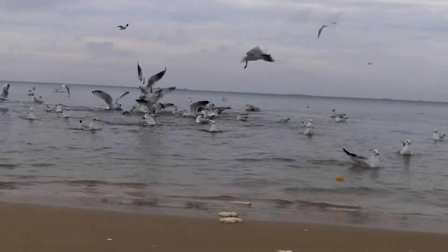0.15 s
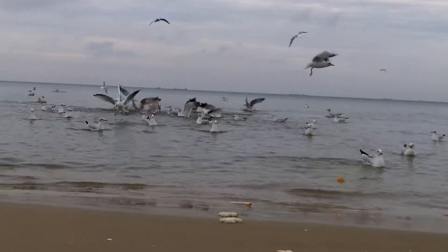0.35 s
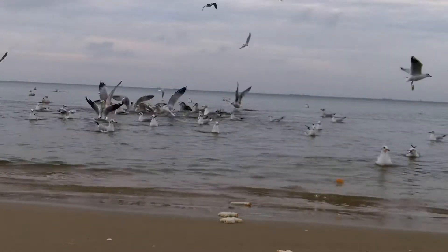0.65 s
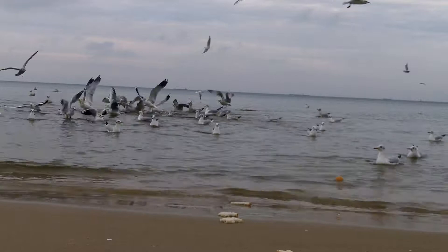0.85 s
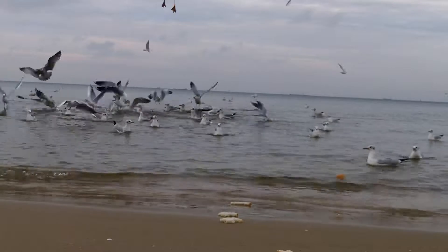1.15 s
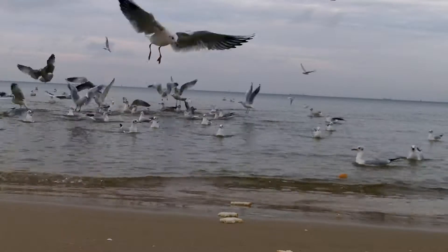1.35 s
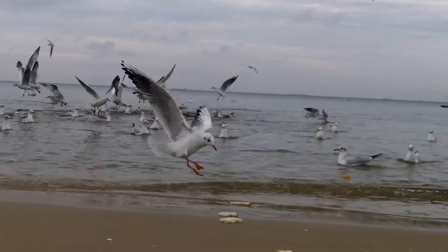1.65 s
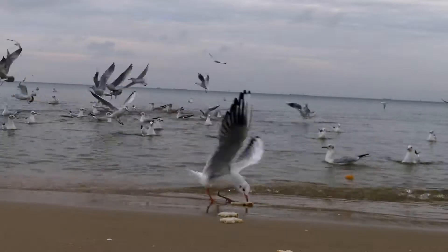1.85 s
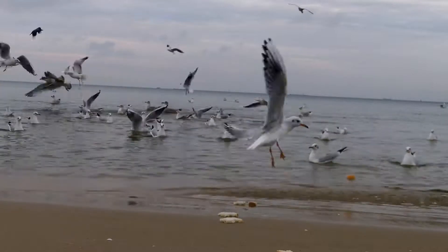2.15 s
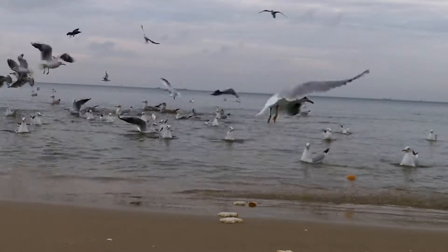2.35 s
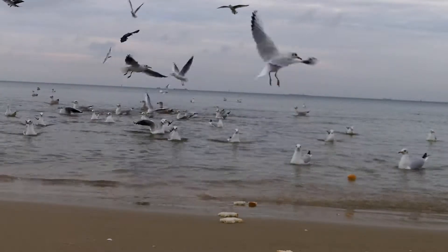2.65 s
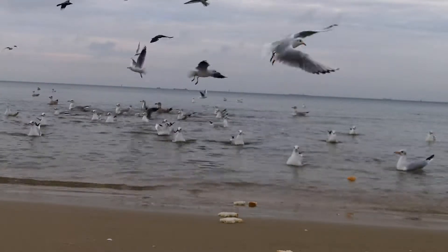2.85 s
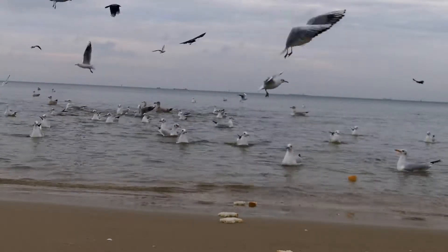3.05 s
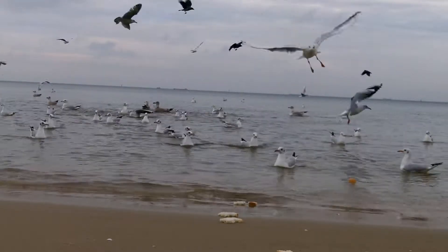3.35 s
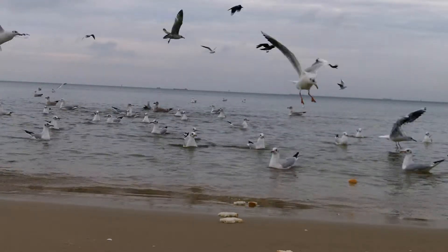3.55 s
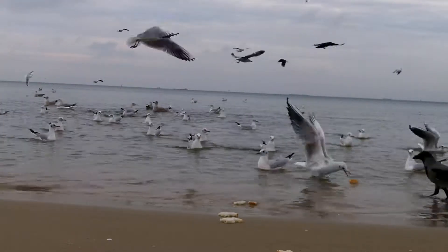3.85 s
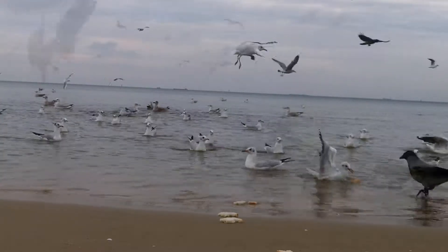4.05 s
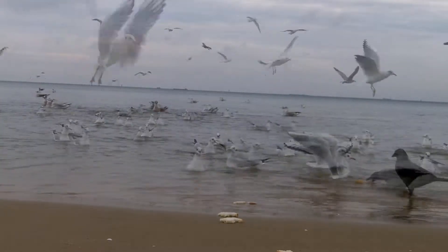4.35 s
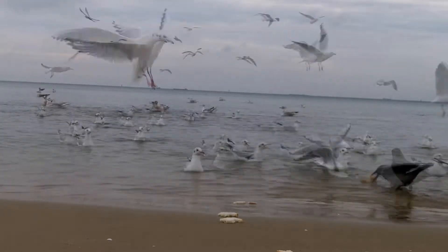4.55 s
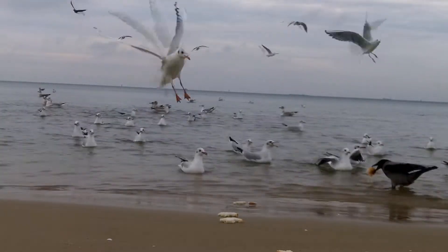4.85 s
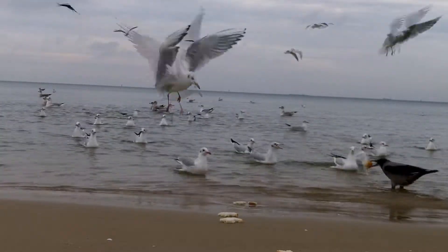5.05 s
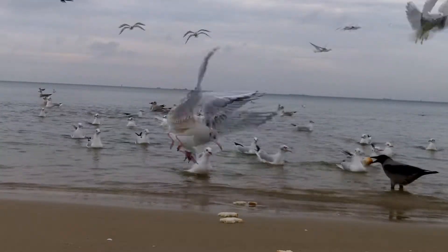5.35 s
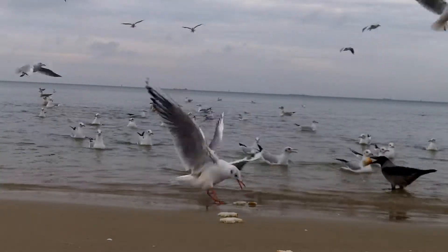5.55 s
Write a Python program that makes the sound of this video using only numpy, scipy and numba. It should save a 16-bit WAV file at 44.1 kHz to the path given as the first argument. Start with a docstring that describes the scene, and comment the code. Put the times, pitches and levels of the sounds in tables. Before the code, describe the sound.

Close gulls squabble at a calm water's edge. Clear wavering mews open over distant barking, then harsh screams, dry creaks and thin squeals overlap. Quick barks dominate the middle, with another scream past three seconds. The crowd thins, two screams follow each other, and a rasping wail sinks to a clear tone. Soft plops and low sea rumble lie beneath. Open air, nearly dry, microphone near the birds.

```python
"""Small gulls squabble over scraps in the shallows of a calm beach: membrane pulses ring throat and bill.
Long rasping screams, mews, creaks, short barks and a late wail overlap close by; gliding tones make thin squeals.
A flock of barks calls farther out, and bills snap as very short rings of noise.
Bodies plop into the water with ringing cavities and spray, and small bubbles sound over a low rumble of sea air,
built from bands of noise whose level slowly rises and falls."""
import sys
import numpy as np
from scipy import signal
from scipy.io import wavfile
from scipy.ndimage import uniform_filter1d
from numba import njit

SR = 44100
rng = np.random.default_rng(int(sys.argv[2]) if len(sys.argv) > 2 else 0)


def dump(signal):
    """Clip the signal to [-1, 1] and save it as 16-bit WAV at the path in sys.argv[1]."""
    limited = np.clip(np.atleast_2d(signal).T, -1, 1)
    pcm = np.round(limited * 32767).astype(np.int16)
    wavfile.write(sys.argv[1], SR, pcm)


N = 250929
TIME = np.arange(N) / SR

MEW_ROUGHNESS = .14  # 0-1
COLLAPSE, COLLAPSE_S = 0.22, 0.018  # share of the pitch lost at the end of a scream or wail, time constant


def undb(db):
    """Amplitude of a level in dB."""
    return 10 ** (np.asarray(db) / 20)


def unit(x):
    """The same sound at an overall RMS of 1."""
    return x / np.sqrt(np.mean(x ** 2) + 1e-18)


def steady(x):
    """The same sound at an even level of 1."""
    power = np.abs(uniform_filter1d(x ** 2, size=1400))
    return x / np.sqrt(power + 1e-12)


def walk(n, rate):
    """Smooth chance of spread about 1 that takes a new value rate times a second."""
    size = max(int(SR / rate), 1)
    held = np.repeat(rng.standard_normal(n // size + 2), size)
    return 1.2 * uniform_filter1d(held, size)[:n]


def cut(x, hz, kind, order=2):
    """Plain low or high cut."""
    return signal.sosfilt(signal.butter(order, min(hz, .45 * SR), kind, fs=SR, output="sos"), x)


@njit
def svf(x, hz, width):
    """State-variable band-pass whose centre may move."""
    y, band, low = np.empty(len(x)), 0., 0.
    for i in range(len(x)):
        g, k = np.tan(np.pi * hz[i] / SR), width / hz[i]
        v = (band + g * (x[i] - low)) / (1 + g * (g + k))
        band, low, y[i] = 2 * v - band, low + 2 * g * v, k * v
    return y


def ring(x, hz, width_hz):
    """A resonance at a fixed or moving pitch."""
    return svf(x + 1e-18, hz * np.ones(len(x)), float(width_hz))


def fade(n, seconds):
    """Soft start and end."""
    i = np.arange(n)
    return np.sin(np.pi / 2 * np.clip(np.minimum(i, n - i) / (seconds * SR), 0, 1)) ** 2


def add(out, start, x):
    """Lay a sound into the mix from a start in seconds."""
    i = max(int(start * SR), 0)
    out[i:i + len(x)] += x[:max(N - i, 0)]


def follow(rows):
    """Start time, then each control sample by sample."""
    s, *controls = np.transpose(rows)
    t = np.arange(s[0], s[-1], 1 / SR)
    return s[0], *(np.interp(t, s, control) for control in controls)


def syrinx(hz, flutter, rough, split, flutter_hz=133, blur=0):
    """Membrane pulses; a slower vibration chops them into a trill, and strain blurs them and makes them uneven."""
    swing, jitter, air_level = .05, .11, .7  # pitch shares moved by trill and roughness, then air amplitude
    trill_break = .4  # above this flutter the voice stops between bursts and starts afresh
    trill_skew = 1.3  # each burst swells slowly and shuts quickly
    n, flutter, rough = len(hz), np.clip(flutter, 0, 1), np.clip(rough, 0, 1)
    bursts = np.cumsum(flutter_hz * (1 + (.008 + .2 * rough ** 2) * walk(n, 150))) / SR
    opening = -np.cos(2 * np.pi * (bursts % 1) ** trill_skew)

    bend = 1 + swing * flutter * opening
    bend = bend + jitter * rough * cut(walk(n, 900), 90, "high", order=1)
    bend = bend + (.002 + .002 * rough) * walk(n, 60)
    phase = 2 * np.pi * np.cumsum(hz * bend) / SR
    # in a deep trill every burst starts from rest, which packs the partials at the rate of the trill
    restart = (np.diff(np.floor(bursts), prepend=0) > 0) & (flutter > trill_break)
    last_restart = np.maximum.accumulate(np.arange(n) * restart)
    phase = phase - phase[last_restart] + np.pi

    # each closure is a negative pulse whose shape keeps changing, so the partials swell one by one
    pulses = np.zeros(n)
    for k in range(1, 22):
        if k * hz.mean() < 9000:
            stray = blur * rng.standard_normal() + .3 * walk(n, 30)  # radians
            pulses -= np.cos(k * phase + stray) * undb(2.2 * walk(n, 28))
    # strong and weak closures alternate when the voice splits
    pulses = pulses * (1 + split * np.cos(phase / 2))
    air = rng.standard_normal(n) * (1 + np.cos(phase))
    source = steady(pulses) * undb(2.2 * rough * walk(n, 600)) + air_level * rough * unit(air)
    return source * (1 + flutter * opening)


def throat(source, hz, bright_db, width_hz, low_hz, bill_hz=4100, top_hz=5400):
    """A moving throat resonance, and an upper one that grows as the bill opens."""
    source = cut(cut(source, low_hz, "high"), top_hz, "low", order=5)
    body = cut(ring(source, hz, width_hz), 3560, "low", order=3)
    bill = ring(ring(source, bill_hz, 1500), bill_hz, 2050)
    return steady(steady(body) + undb(bright_db) * steady(bill))


def cry(start, hz, db, throat_hz, bright_db, flutter, rough, width_hz, split, flutter_hz=133, blur=0,
        low_hz=1250, edge=0.0021, drop=COLLAPSE, bill_hz=4100, top_hz=5700):
    """One long cry: the syrinx sounds through throat and bill, and its pitch may drop at the end."""
    n, out = len(hz), np.zeros(N)
    time_left = TIME[:n][::-1]
    hz = hz * (1 - drop * np.exp(-time_left / COLLAPSE_S))
    source = syrinx(hz, flutter, rough, split, flutter_hz, blur)
    voice = throat(source, throat_hz, bright_db, width_hz, low_hz, bill_hz, top_hz)
    add(out, start, voice * undb(db + .8 * walk(n, 45)) * fade(n, edge))
    return out


def bark(length, hz, throat_hz, bright_db, flutter, rough, swell=1):
    """Level and pitch arch, pitch less in longer calls, which stay nearly flat; swell under 1 hardens the attack."""
    droop, slack, variety = .22, .45, .35  # pitch shares lost at both ends and at the end, spread between barks
    u = np.linspace(-1, 1, int(max(length, .01) * 1.32 * SR))  # the soft ends lengthen the call
    arch = min(0.09 / max(length, .01), 1) ** 4
    pitch = hz * np.clip(1 - arch * (droop * u ** 2 + slack * u.clip(0) ** 3), .2, 1)
    lean, attack = variety * rng.uniform(-0.974, 1, 2)
    pitch, swell = pitch * (1 + lean * u / 10), swell * (1 + attack)
    source = syrinx(pitch, flutter, 1.4 * rough, split=min(0.4 * rough, 1))
    # a small throat radiates little below 1000 Hz
    voice = throat(source, throat_hz, bright_db, width_hz=1970, low_hz=1000)
    return voice * np.abs(np.sin(np.pi * ((u + 1) / 2) ** swell)) ** 0.73


# A clear, wavering mew. Each row: time in seconds, pitch in Hz, level in dB before the gain,
# brightness as bill over throat in dB.
MEW_CURVE = [(0.0, 1274, -23, -29), (0.025, 1190, -22, -25), (0.052, 1213, -23, -25),
             (0.08, 1147, -24, -22), (0.116, 1207, -20, -4.5), (0.146, 1150, -26, 2.5),
             (0.17, 1248, -23.5, -5), (0.2, 1167, -29.5, -7.5), (0.227, 1239, -21.5, -4),
             (0.244, 1207, -30, -4), (0.272, 1140, -23.5, -3)]
# A softer mew that answers it. Each row: time in seconds, pitch in Hz, level in dB.
ANSWER_CURVE = [(0.43, 1127, -29), (0.465, 1155, -33.5), (0.478, 1193, -23), (0.505, 1160, -33),
                (0.56, 1108, -31), (0.63, 1048, -34), (0.685, 1119, -39), (0.73, 1088, -33.5)]


def mews(gain_db=-2.0):
    """Clear calls through a narrow bill; the first brightens as the bill opens."""
    start, hz, db, bright_db = follow(MEW_CURVE)
    first = cry(start, hz, db + gain_db, throat_hz=1870, bright_db=bright_db, flutter=0.14,
                rough=MEW_ROUGHNESS, width_hz=720, split=0.16, low_hz=880, drop=0, bill_hz=3620, top_hz=3900)
    start, hz, db = follow(ANSWER_CURVE)
    answer = cry(start, hz, db, throat_hz=1840, bright_db=-12, flutter=0.13,
                 rough=MEW_ROUGHNESS, width_hz=530, split=0.15, low_hz=750, drop=0)
    return first + answer


# The slow rise and fall of the background noise. Each row: time in seconds, level in dB,
# of which only the departure from the average is used.
BACKGROUND_LEVEL = [(0.0, -48), (2.541, -43), (4.06, -49.5), (4.901, -61.5), (5.69, -61)]
# The colour of the background noise. Each row: frequency in Hz, relative level in dB per Hz.
SEA_SPECTRUM = [(25, -4.5), (66, -0.5), (100, -9.5), (180, -13.5), (1100, -12.5), (3000, -18), (7000, -38),
                (13000, -36.5), (15000, -42)]


def sea(db=-48, bubble_db=-61, count=900):
    """Bands of noise make a low rumble of air and a faint hiss, slowly rising and falling; small bubbles chirp upward."""
    s, level_db = np.transpose(BACKGROUND_LEVEL)
    swell = np.interp(TIME, s, level_db - np.mean(level_db))
    points_hz, points_db = np.transpose(SEA_SPECTRUM)
    out = np.zeros(N)
    for hz in 24 * 2 ** np.arange(0, 9.5, .5):  # half-octave bands
        band = unit(ring(ring(rng.standard_normal(N), hz, hz / 2), hz, hz / 2))
        # a band widens with its pitch, so it gathers more power
        band_db = np.interp(np.log(hz), np.log(points_hz), points_db) + 10 * np.log10(hz)
        swell_share = .5 if 100 < hz < 8000 else .3  # rumble and hiss hold steadier
        out += band * undb(band_db + swell * swell_share + 2 * walk(N, 19))

    bubbles, t = np.zeros(N), TIME[:1500]
    for when, size, loud in rng.random((count, 3)):
        hz = 300 * 14 ** size
        bubble = np.sin(2 * np.pi * hz * (t + 5 * t ** 2)) * np.exp(-t * hz / 3)
        add(bubbles, when * N / SR, bubble * undb(10 * loud ** 3))
    return unit(out) * undb(db) + unit(bubbles) * undb(bubble_db + swell)


# Bouts of the squabble farther out. Each row: start in seconds, end in seconds.
BOUTS = [(0, 1.65), (2, 2.68), (3.0, 3.7)]


def far_flock(db=-43, calls_per_s=19):
    """Birds farther out bark one over the other while the squabble lasts."""
    out = np.zeros(N)
    for start, end in BOUTS:
        count = max(round((end - start) * calls_per_s), 1)
        for k, (when, long, high, colour, loud) in enumerate(rng.random((count, 5))):
            call = bark(.055 + .06 * long, 550 + 600 * high, 1300 + 1000 * colour, -6.0, colour / 2, 0.18)
            add(out, start + (k + when) / count * (end - start), call * undb(2.0 * loud))
    return unit(out) * undb(db)


# Thin squeals. Each row: start in seconds, length in seconds, first, middle and last pitch in Hz,
# level in dB, octave over fundamental in dB.
SQUEAL_CALLS = [(0.041, 0.066, 1185, 1098, 1004, -36, -7), (0.178, 0.062, 1795, 1684, 1710, -42, -8),
                (0.245, 0.027, 2490, 2580, 2780, -39, -12), (0.274, 0.0694, 1800, 1730, 1560, -37.5, -9),
                (.325, 0.15, 2900, 2823, 2900, -39.5, -10.5), (0.363, 0.068, 4130, 4050, 4020, -39, -24),
                (0.427, 0.26, 3500, 3290, 3320, -40.5, -11.5), (0.927, 0.21, 4500, 4470, 4400, -42, -48),
                (1.044, 0.05, 3055, 2830, 2900, -32, -37), (1.091, 0.087, 3540, 3420, 3270, -35.5, -38),
                (1.087, 0.061, 1665, 1720, 1750, -32.5, -22), (1.167, 0.02, 2930, 2840, 2720, -29, -23),
                (1.193, 0.067, 4200, 4200, 4040, -37, -43), (1.251, 0.062, 3340, 3160, 2970, -32, -22),
                (1.315, .025, 2790, 2860, 2800, -34, -21), (1.996, 0.057, 3050, 3144, 3160, -36.5, -12.5),
                (2.047, 0.047, 2234, 2170, 2120, -35, -2.5), (2.031, 0.19, 4250, 4500, 3870, -41.5, -14.5),
                (2.06, 0.37, 3510, 3353, 3130, -39.5, -19.5), (2.473, 0.035, 3420, 3260, 3270, -41, -11),
                (2.473, .036, 4690, 4720, 4740, -43, -33), (2.511, 0.025, 2910, 2826, 2770, -35.5, -16),
                (2.818, 0.017, 2440, 2510, 2670, -31.5, -7.5), (3.01, 0.029, 3110, 3010, 2960, -27.5, -36),
                (3.04, 0.037, 2210, 2232, 2296, -25.5, -7.5), (3.245, .06, 1497, 1477, 1390, -45.5, -5),
                (3.303, 0.26, 4510, 4620, 4026, -38.5, -23.5), (3.653, 0.046, 3520, 3490, 3180, -40, -32),
                (5.193, 0.097, 3680, 3740, 3730, -36, -47), (5.266, 0.19, 2830, 2720, 2580, -38, -30)]


def squeals(waver=0.0062, swell_db=7):
    """Nearly pure tones that glide in one arc, with their octave, louder in the middle than at the ends."""
    out = np.zeros(N)
    for start, length, first, middle, last, db, octave_db in SQUEAL_CALLS:
        n = int(max(length, .015) * SR)
        u = np.linspace(-1, 1, n)
        hz = middle + (last - first) / 2 * u + ((first + last) / 2 - middle) * u ** 2
        phase = 2 * np.pi * np.cumsum(hz * (1 + waver * walk(n, 250))) / SR
        octave = undb(octave_db + 3 * walk(n, 30)) * np.sin(2 * phase)
        tone = np.sqrt(2) * (np.sin(phase) + octave)
        level_db = db + swell_db * (1 / 3 - u ** 2) + 2 * walk(n, 120)
        add(out, start, tone * fade(n, 0.0034) * undb(level_db))
    return out


# Creaks, so slow that each pulse is heard. Each row: start and end in seconds, first and last pulses per second,
# first and last level in dB, first and last throat resonance in Hz, throat width in Hz,
# brightness as bill over throat in dB, roughness 0-1.
CREAK_CALLS = [(0.2706, 0.287, 284, 305, -17, -34, 2170, 2360, 420, -30, 0.041),
               (0.2805, 0.309, 298, 290, -29, -27.5, 2570, 2080, 800, -27, 0.051),
               (0.736, 0.892, 266.8, 237, -33, -28, 2410, 2400, 650, -33, 0.45),
               (0.902, 1.038, 246.7, 223.2, -30, -28, 2360, 2170, 470, -13, 0.27),
               (1.042, 1.322, 235.2, 222.5, -30, -29.5, 2100, 2150, 520, -6, 0.69),
               (1.323, 1.463, 268.2, 249.7, -31.5, -26, 2250, 2380, 520, -7.5, 0.75),
               (3.082, 3.119, 418, 340.4, -28, -26.5, 3000, 3050, 1400, -15, 0.47),
               (3.115, 3.196, 336.7, 259.6, -30, -30, 2900, 1970, 1100, -4, 0.46),
               (3.206, 3.245, 298, 223.3, -25.5, -36, 2000, 1850, 800, -9, 0.33)]


def creaks(jitter=0.13, uneven_db=1.0, wander=0.16, bill_hz=3450, bill_width_hz=1200,
           puff_s=0.001, puff=2.5, attack_s=0.015):
    """The membranes slap shut one pulse at a time; each slap and its puff of air ring the moving throat and the bill."""
    out = np.zeros(N)
    for start, end, rate0, rate1, db0, db1, throat0, throat1, width_hz, bright_db, rough in CREAK_CALLS:
        n = int(max(end - start, .008) * SR)
        cycles = np.cumsum(np.linspace(rate0, rate1, n) * (1 + jitter * rough * walk(n, 150))) / SR
        at = np.flatnonzero(np.diff(np.floor(cycles), prepend=-1))
        slaps = np.zeros(n + 400)  # room for the last ring
        unevenness = uneven_db * rough * rng.standard_normal(len(at))
        size = undb(np.linspace(db0, db1, len(at)) + unevenness)
        # a rougher creak takes longer to reach full size
        slaps[at] = size * np.minimum((TIME[at] + 0.00099) / max(attack_s * rough, .002), 1)

        tail = np.exp(-TIME[:400] / puff_s)
        air = np.convolve(slaps, tail / np.sqrt(np.sum(tail ** 2)))[:len(slaps)]
        slaps = slaps + puff * rough * air * rng.standard_normal(len(slaps))
        throat_hz = np.linspace(throat0, throat1, len(slaps)) * (1 + wander * rough * walk(len(slaps), 89.3))
        body = ring(ring(slaps, throat_hz, width_hz), throat_hz, 1600)
        bill = ring(ring(slaps, bill_hz, bill_width_hz), bill_hz, bill_width_hz)
        voice = unit(body) + undb(bright_db) * unit(bill)
        voice = cut(cut(voice, 4630, "low", order=5), 730, "high")
        add(out, start, unit(voice) * np.sqrt(np.mean(size ** 2) * n / len(slaps)))
    return out


# Short barks. Each row: middle in seconds, length in seconds before the soft ends, top pitch in Hz before
# a slight random lean, level in dB before the gain, throat resonance in Hz.
BARK_CALLS = [(0.397, 0.086, 409.7, -31.5, 2070), (1.39, 0.07, 697, -32, 1600),
              (1.67, 0.077, 843, -32, 2650), (1.847, 0.07, 705, -31, 1630),
              (1.982, 0.047, 746, -32.5, 2380), (2.112, 0.064, 466, -29, 1590),
              (2.219, 0.031, 721, -30.5, 2170), (2.3, 0.15, 664.4, -33, 1600),
              (2.386, 0.039, 935, -28.5, 2330), (2.487, 0.043, 818, -37, 2360),
              (2.531, 0.036, 481, -31.5, 2010), (2.589, 0.068, 643.5, -32, 1340),
              (2.654, 0.061, 688, -34, 2080), (2.706, 0.039, 887, -28, 2760),
              (2.798, 0.043, 569, -28, 2220), (2.864, 0.046, 703, -28.5, 1680),
              (2.935, 0.03, 618, -38, 3000), (2.98, 0.05, 864, -28.5, 3070), (3.041, 0.053, 739, -36, 2000),
              (3.162, 0.061, 642.5, -30, 1670), (3.661, 0.059, 705, -34, 1750),
              (3.781, 0.067, 687, -30.5, 1530), (3.909, 0.047, 399, -44.5, 2600),
              (4.028, 0.063, 503.6, -30, 1670), (4.157, 0.084, 684, -42, 1640),
              (4.235, 0.047, 466, -34.5, 1560), (4.353, 0.084, 643, -32, 2840),
              (5.466, 0.051, 401.4, -31, 2030), (5.552, 0.085, 657, -37.5, 1410)]


def barks(gain_db=2.05):
    """The short calls of the nearest birds; the highest ones burst out harder and trade their rasp for a trill."""
    plain_rough, trill_rough = .42, .19  # relative roughness
    plain_swell, trill_swell = .92, .58  # the lower, the harder the attack
    out = np.zeros(N)
    for middle, length, hz, db, throat_hz in BARK_CALLS:
        # barks pushed above the first pitch in Hz break into a trill, full at the second
        trill = np.interp(hz, [660, 950], [0, 1])
        rough = plain_rough + trill * (trill_rough - plain_rough)
        swell = plain_swell + trill * (trill_swell - plain_swell)
        call = bark(length, hz, throat_hz, bright_db=-5, flutter=0.041 + trill, rough=rough, swell=swell)
        add(out, middle - len(call) / SR / 2, undb(db + gain_db) * call)
    return out


# Screams. Each row: start, crest and end in seconds, first, crest and last pitch in Hz, sag power,
# then as they stand at the crest: level in dB, throat resonance in Hz, throat width in Hz, bill resonance in Hz,
# brightness as bill over throat in dB, flutter 0-1, flutter rate in Hz, roughness 0-1, split 0-1.
SCREAM_CALLS = [(0.427, 0.46, .59, 556, 602, 526, 1.45, -29.5, 1840, 1210, 3300, -31, 0.01, 112, 0.54, 0.53),
                (0.566, 0.616, 0.97, 782, 965, 760, 1.06, -29, 3250, 1100, 4530, 0.5, 0.47, 117.1, 0.79, 0.43),
                (1.028, 1.101, 1.33, 699.4, 703.6, 662.5, 1.13, -30.5, 2010, 700, 3760, -6.5, 0, 100.3, 0.46, 0.2),
                (1.41, 1.488, 1.68, 796, 982, 791, 1.6, -28, 2640, 750, 4280, 0, 0.47, 130.3, 0.75, 1),
                (3.315, 3.401, 3.67, 723, 919, 700, 1.7, -28, 2570, 2170, 4200, -2, 0.72, 139.8, 0.3, 0.57),
                (4.392, 4.468, 4.59, 729, 913, 893, 1.4, -33.5, 2240, 2010, 4040, -1, 0.56, 130.4, 0.53, 0.56),
                (4.535, 4.575, 4.85, 875, 930, 902, 2.9, -31.5, 2500, 1060, 3980, -3, 0.43, 133, 0.65, 0.46)]


def screams():
    """Pitch leaps to a crest and sags as the push runs out; bill, throat, trill rate and rasp slacken with it."""
    bill_db_per_octave, level_db_per_octave = 14, 11.5
    throat_power, bill_power, flutter_power, strain_power = 0.73, 0.2, 0.57, 1.22  # powers of the pitch
    out = np.zeros(N)
    for (start, crest, end, first, top, last, sag, db, throat_hz, width_hz, bill_hz, bright_db,
         flutter, flutter_hz, rough, split) in SCREAM_CALLS:
        t = np.arange(start, end, 1 / SR)
        leap = (top - first) * np.interp(t, [start, crest], [1, 0]) ** 2
        fall = (top - last) * np.interp(t, [crest, end], [0, 1]) ** sag
        hz = top - leap - fall
        effort = hz / top
        octaves = np.log2(effort)
        out += cry(start, hz, db + level_db_per_octave * octaves, throat_hz * effort ** throat_power,
                   bright_db + bill_db_per_octave * octaves, flutter, rough * effort ** strain_power,
                   width_hz, split, flutter_hz=flutter_hz * effort ** flutter_power,
                   blur=2.46 * rough,  # radians by which the partials stray from a clean pulse
                   edge=0.012, bill_hz=bill_hz * effort ** bill_power)
    return out


# Birds splashing down in the water. Each row: start in seconds, level in dB, cavity resonance in Hz.
SPLASHDOWNS = [(0.444, -53, 264), (4.25, -53.5, 246), (4.53, -56.5, 318)]


def plops(decay=0.024, spray_decay=0.074, spray_db=-5):
    """A body opens a cavity that rings upward amid noise at its pitch; spray outlasts it."""
    out, t = np.zeros(N), TIME[:7000]
    for start, db, hz in SPLASHDOWNS:
        rising_tone = np.sin(2 * np.pi * hz * (t + 2 * t ** 2))
        cavity = rising_tone + 5.2 * unit(ring(rng.standard_normal(len(t)), hz, 340))
        spray = unit(ring(rng.standard_normal(len(t)), 1600, 1200)) * undb(spray_db)
        splash = cavity * np.exp(-t / decay) + cut(spray, 4000, "low") * np.exp(-t / spray_decay)
        add(out, start, undb(db) * (1 - np.exp(-t / 0.00067)) * splash)
    return out


# Bill snaps. Each row: start in seconds, peak level in dB, ring in Hz.
BILL_SNAPS = [(1.768, -27.5, 2920), (3.875, -25.5, 2330)]


def snaps(decay=0.0016):
    """Bills clack shut: a short burst of noise excites a very short ring."""
    out, t = np.zeros(N), TIME[:2000]
    for start, db, hz in BILL_SNAPS:
        clack = ring(rng.standard_normal(len(t)) * np.exp(-t / decay), hz, 1300)
        clack = cut(clack, 5600, "low", order=6)
        add(out, start, clack / np.abs(clack).max() * undb(db))
    return out


# A wail that sinks from a rasp into a clear tone. Each row: time in seconds, pitch in Hz,
# level in dB before the gain.
WAIL_CURVE = [(4.8, 828, -28), (4.86, 898, -31.5), (4.96, 890, -30), (5.01, 944, -29), (5.1, 925, -30.5),
              (5.188, 894, -30), (5.25, 812, -34), (5.3, 790, -30), (5.35, 756, -33), (5.422, 759, -29.5),
              (5.448, 733, -26), (5.485, 724, -50)]
# The strain of the wail dies away between these two times in seconds.
STRAIN_FADE_S = [5.154, 5.39]


def wail(gain_db=1.5):
    """Trill and rasp die away as the pitch sinks and the strain leaves the membranes."""
    rasp_bright_db, clear_bright_db = -4.5, -0.5  # bill over throat
    start, hz, db = follow(WAIL_CURVE)
    strain = np.interp(start + TIME[:len(hz)], STRAIN_FADE_S, [1, 0])
    bright_db = clear_bright_db + strain * (rasp_bright_db - clear_bright_db)
    return cry(start, hz, db + gain_db, throat_hz=1680 + 140 * strain, bright_db=bright_db,
               flutter=0.44 * strain, rough=.03 + .42 * strain, width_hz=660, split=0.27 * strain,
               flutter_hz=107.2, blur=0.82, low_hz=1130, edge=0.0046,
               bill_hz=3400 + 450 * strain, top_hz=5430)


def shore(x, db=-19, t60=0.52):
    """Ripples and sand scatter a faint short tail of decaying noise."""
    t = TIME[:22000]
    tail = rng.standard_normal(len(t)) * np.exp(-np.log(1000) * t / t60) * (t > .004)
    return x + undb(db) * signal.fftconvolve(x, tail / np.sqrt(np.sum(tail ** 2)))[:N]


def scene():
    """Near birds, the flock behind them and the water."""
    birds = mews() + screams() + wail() + barks() + creaks() + squeals() + snaps() + far_flock()
    return (shore(birds + plops()) + sea())[None]


def record(dry):
    """A narrow dip near 8 kHz and a steep cut above 15 kHz."""
    dip = signal.butter(2, [7500, 8300], "bandstop", fs=SR, output="sos")
    top_cut = signal.ellip(8, .2, 70, 15150, fs=SR, output="sos")
    return signal.sosfilt(top_cut, signal.sosfilt(dip, dry))


dry = scene()
out = record(dry)
dump(out)
```